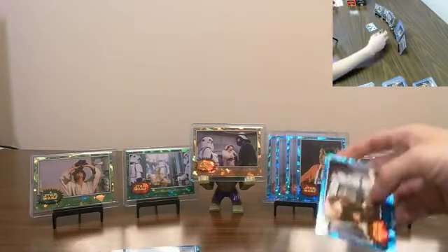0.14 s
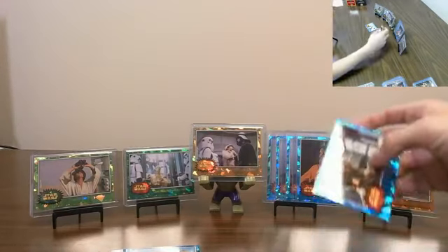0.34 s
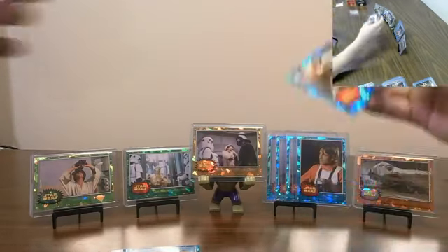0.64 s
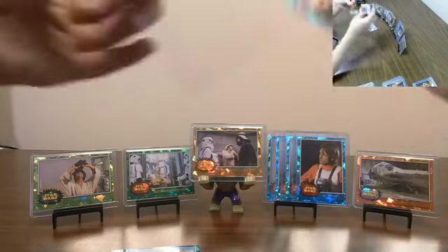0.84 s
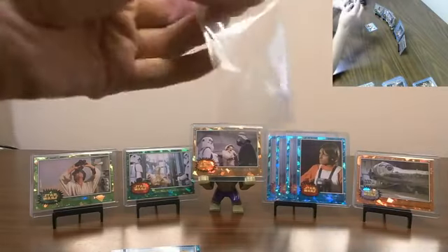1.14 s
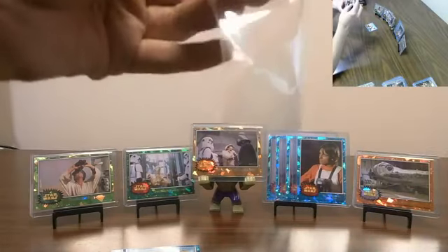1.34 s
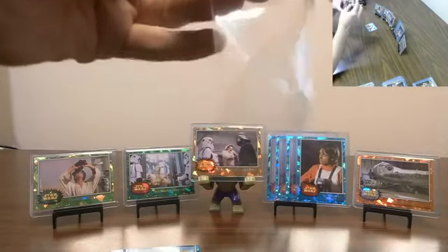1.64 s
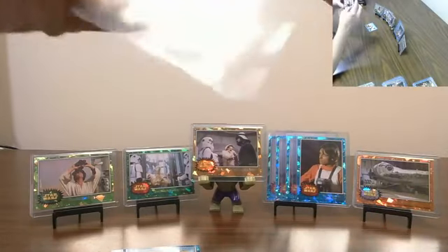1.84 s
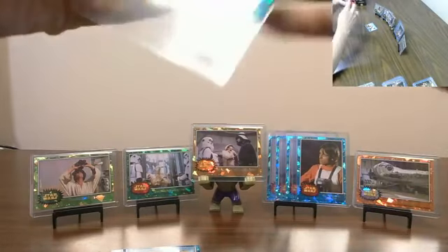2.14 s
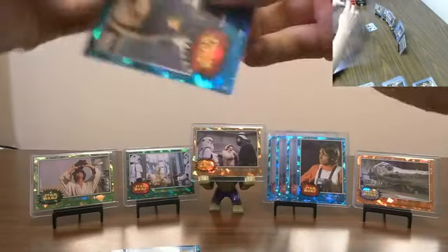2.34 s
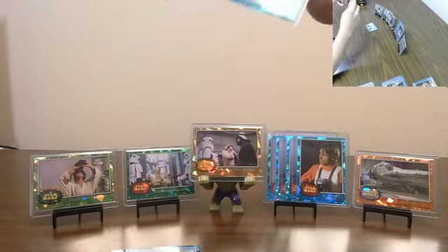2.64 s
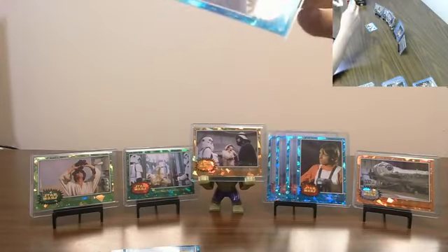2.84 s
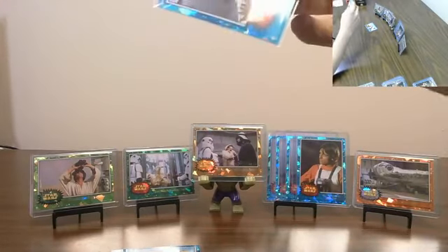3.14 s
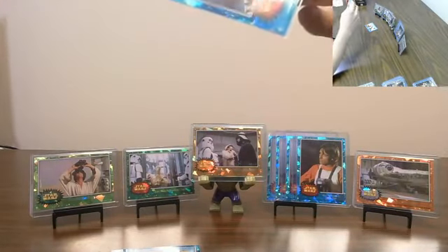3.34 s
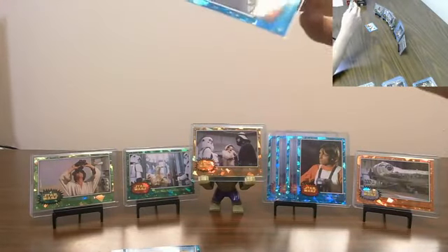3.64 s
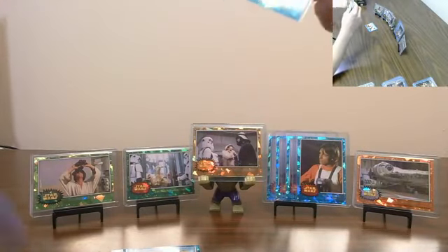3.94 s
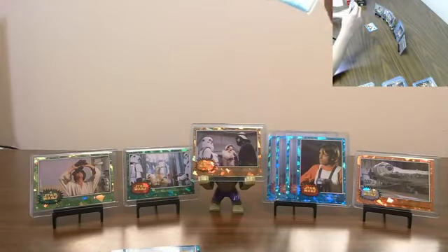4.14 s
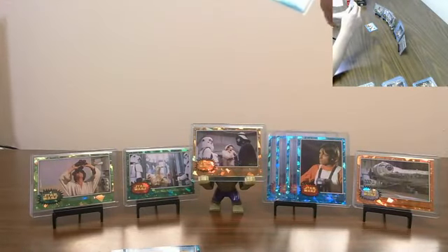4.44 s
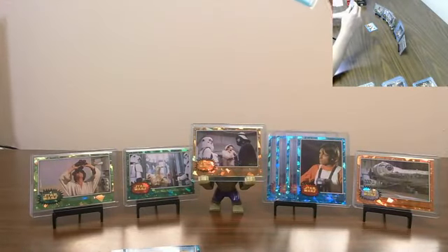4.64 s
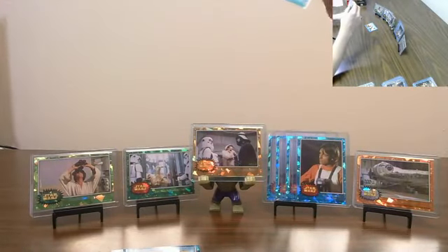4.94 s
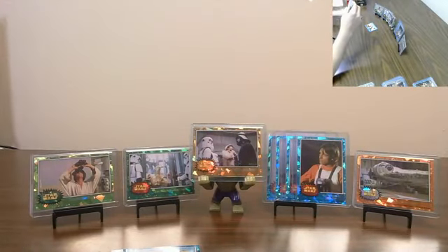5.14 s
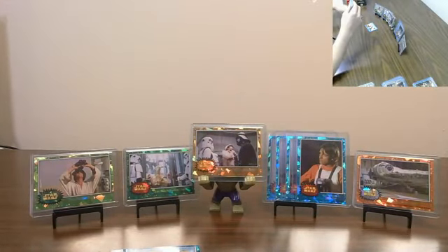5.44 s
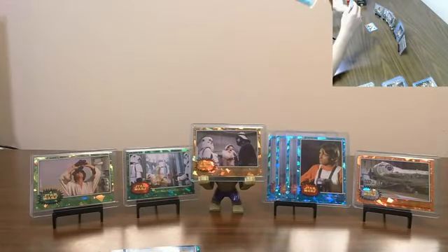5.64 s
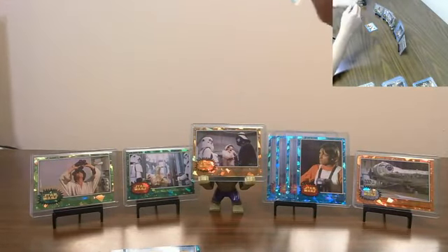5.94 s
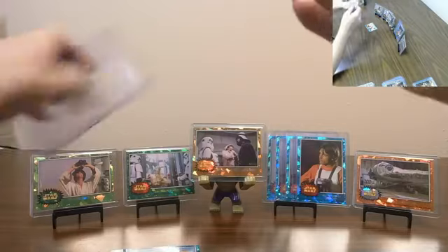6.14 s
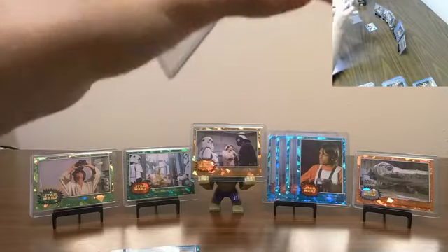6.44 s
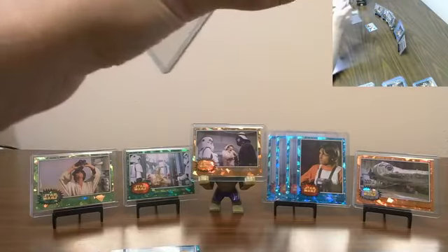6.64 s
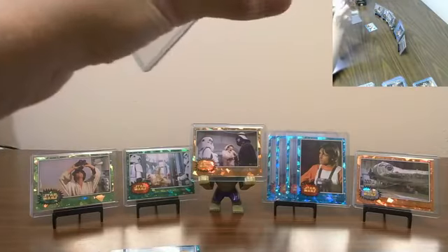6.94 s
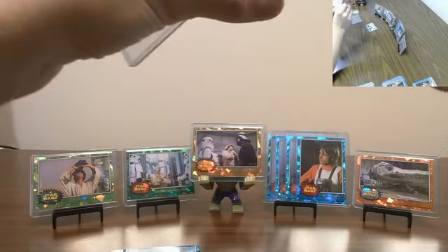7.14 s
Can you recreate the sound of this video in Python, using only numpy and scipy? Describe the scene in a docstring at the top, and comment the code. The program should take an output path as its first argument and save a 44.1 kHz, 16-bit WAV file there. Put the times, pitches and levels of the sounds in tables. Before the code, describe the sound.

Close handling of thin crinkly plastic and a stiff card, one sharp hard clack, crisp clicks, over faint fan throb in a quiet room.

```python
"""Card into a plastic sleeve

A trading card is slid into a thin plastic sleeve close to the microphone, over a table in a small quiet room.
The film swishes and ticks (shaped friction noise, short snaps) and the card's edge rasps home (stick-slip
through resonances). Rigid holders are knocked, clacked down and clicked apart (cracks and ringing modes).
Under it lie room air (coloured noise), a fan's low throb, mains hum and a faint pulsing whine (sines)."""
import sys
import numpy as np
from scipy import signal
from scipy.fft import rfft, irfft, next_fast_len
from scipy.io import wavfile
from scipy.ndimage import uniform_filter1d, minimum_filter1d, map_coordinates

SR = 44100
rng = np.random.default_rng(int(sys.argv[2]) if len(sys.argv) > 2 else 0)


def master(y):
    """Save y as 16-bit WAV."""
    cut = np.clip(np.atleast_2d(y).T, -1, 1)
    pcm = np.round(cut * 32767)  # scale
    wavfile.write(sys.argv[1], SR, pcm.astype(np.int16))


N = 321930  # samples in the scene


def amp(db):
    """Decibels to gain."""
    return np.exp(np.log(10) / 20 * np.asarray(db))


def unit(x):
    """Scale to rms 1."""
    return x / np.sqrt(np.mean(x ** 2) + 1e-20)


def along(points, hz):
    """Read (f/Hz, value) points at any frequency, on a log axis."""
    f, v = np.transpose(points)
    return np.interp(np.log(hz + 1), np.log(f + 1), v)


def fade(t, t60):
    """Exponential decay, 60 dB down after t60 seconds."""
    return np.exp(-np.log(1000) * t / t60)


def wobble(rate):
    """A smooth random curve through `rate` knots a second."""
    knots = rng.standard_normal(int(N * rate / SR) + 4)
    place = np.arange(0, len(knots) - 1, .125)  # eight spline points per knot
    return np.interp(np.arange(N) * rate / SR, place, map_coordinates(knots, [place]))


def filtered(x, response):
    """Multiply the spectrum of x by a response of frequency."""
    m = next_fast_len(len(x) + 8192)
    return irfft(rfft(x, m) * response(np.fft.rfftfreq(m, 1 / SR)), m)[:len(x)]


def coloured(x, spectrum):
    """Filter x by a (f/Hz, level/dB) response and scale it to rms 1."""
    return unit(filtered(x, lambda hz: amp(along(spectrum, hz))))


def add(track, s, sound):
    """Mix a sound into the track, s seconds in."""
    i = max(round(s * SR), 0)
    track[i:i + len(sound)] += sound[:max(len(track) - i, 0)]


def room(x, wet_db):
    """Add the answer of walls and table, drawn anew at each call; each frequency dies at its own speed."""
    # how long the room holds each frequency: (f/Hz, t60/s)
    decay_times = [(150, 0.6), (600, 0.094), (1500, 0.26), (4000, 0.25), (8000, .34), (15000, 0.17)]
    hz, t, z = signal.stft(rng.standard_normal(16384), SR, nperseg=256)
    z = z * fade(t, along(decay_times, hz)[:, None])
    tail = signal.istft(z, SR, nperseg=256)[1]
    tail *= 1 - np.exp(-(np.arange(len(tail)) / SR / 0.0047) ** 2)  # the tail builds up over some 5 ms
    tail *= amp(wet_db) / np.linalg.norm(tail)
    tail[0] += 1  # the direct sound
    tail[int(SR * rng.uniform(.0006, .0016))] += .4  # the bounce off a nearby hand or the table top
    return signal.fftconvolve(x, tail)[:N]


def friction(spectrum, grain_db, flutter_db):
    """Countless tiny slips of uneven size, in clumps: noise whose level flickers fast and slower."""
    unevenness_db = grain_db * wobble(1300) + flutter_db * wobble(70)
    return coloured(rng.standard_normal(N) * amp(unevenness_db), spectrum)


def pressed(rows, attack_s, release_s):
    """Gain of a contact that grips quickly, swells or eases while it slides, then lets go."""
    out = np.zeros(N)
    for s, length, db, growth in rows:
        t = np.maximum(np.arange(N) / SR - s, 0)
        held = np.minimum(t, length)
        grip = 1 - np.exp(-t / attack_s)
        release = np.exp((held - t) / release_s)
        out += amp(db + growth * held) * grip * release
    return out


def snap(spectrum, t60, spread, size=2048):
    """A sudden slip and its short dense ring, through a causal colour; its energy is that of 1 ms at rms 1."""
    t = np.arange(size) / SR
    push = rng.standard_normal(size) * fade(t, t60)
    push *= spread / np.linalg.norm(push)
    push[0] += 1  # the slip itself
    power = uniform_filter1d(np.abs(rfft(push)) ** 2, size=25)
    target = amp(along(spectrum, np.fft.rfftfreq(size, 1 / SR)))
    # divide out the push's own broad shape, then fold the cepstrum so that nothing sounds ahead of the slip
    cepstrum = irfft(np.log(target / np.sqrt(power)))
    cepstrum[1:size // 2] *= 2
    cepstrum[size // 2 + 1:] = 0
    sound = irfft(np.exp(rfft(cepstrum)) * rfft(push))
    return sound / np.linalg.norm(sound) * np.sqrt(SR / 1000)


def background():
    """Room air as coloured noise, a fan's throb and mains hum as sines, a whine that pulses once a turn."""
    # the fan's throb: (multiple of the turning rate, level/dB rms)
    fan_partials = [(1, -61), (2, -68), (3, -70), (4, -76), (6, -86.5), (8, -85), (9, -88.5), (13, -89)]
    # mains hum: (f/Hz, level/dB rms)
    hum_partials = [(120, -70), (177, -82), (240, -86.5)]
    # the whine ahead of its pulsing: (f/Hz, level/dB rms)
    whine_partials = [(5626, -93), (8005, -94)]
    # colour of the room's floor: (f/Hz, level/dB)
    air_colour = [(20, 6.5), (35, -15), (100, -16), (160, -22), (300, -23), (450, -29), (590, -28),
                  (750, -33), (1500, -42), (2500, -43), (5000, -45.5), (7000, -51), (12000, -52),
                  (14000, -48.5), (16000, -57.5)]
    fan_hz = 24.18  # turns a second
    t = np.arange(N) / SR
    turn = 2 * np.pi * fan_hz * t + 0.052 * wobble(1.4)

    def tone(db, phase):
        return amp(db) * np.sqrt(2) * np.sin(phase + rng.uniform(0, 2 * np.pi))

    fan = sum(tone(db, k * turn) for k, db in fan_partials)
    hum = sum(tone(db, 2 * np.pi * hz * t + 0.17 * wobble(6.0)) for hz, db in hum_partials)
    whine = sum(tone(db, 2 * np.pi * hz * t + .5 * wobble(16)) for hz, db in whine_partials)
    pulse = 1 + 0.49 * np.sin(turn)
    air = amp(-57.5) * coloured(rng.standard_normal(N), air_colour)
    return fan + hum + pulse * whine + air


def hands():
    """Dull bumps (decaying low sines) and rubs (dark friction noise) of hands and arms on the table top."""
    # soft bumps: (t/s, level/dB, f/Hz, t60/s)
    bump_rows = [(0, -38.5, 57, 0.16), (0.986, -30.5, 64.7, 0.13), (4.153, -50, 169, 0.17),
                 (4.209, -52, 195, 0.083), (4.386, -49.5, 137, 0.11), (5.476, -31, 140, 0.04),
                 (5.522, -44, 61, 0.2), (6.682, -45, 66.8, 0.18)]
    # a hand shifting on the table: (t/s at the start, length/s, level/dB at the start, growth/dB per s)
    shift_rows = [(4.15, 0.13, -57.5, -68), (4.38, .03, -61.5, -70), (5.474, 0.13, -63, -50)]
    # colour of the rub: (f/Hz, level/dB)
    rub_colour = [(60, -14), (150, 0), (300, -7), (500, -15.5), (1200, -21), (3000, -25), (8000, -44),
                  (16000, -65)]
    rub = friction(rub_colour, grain_db=0.0, flutter_db=4.5)
    out = pressed(shift_rows, attack_s=0.002, release_s=0.03) * rub
    t = np.arange(SR // 2) / SR
    soft_onset = 1 - np.exp(-t / 0.0065)
    for s, db, hz, t60 in bump_rows:
        add(out, s, amp(db) * np.sin(2 * np.pi * hz * t) * fade(t, t60) * soft_onset)
    return out


def crinkles(rate, low_hz, high_hz, cycles, spread_db):
    """Tiny buckles of the film, each with its own size and pitch; a few stand out as ticks."""
    out, t = np.zeros(N), np.arange(128) / SR
    for when, pitch, size in rng.random((int(rate * N / SR), 3)):
        hz = low_hz * (high_hz / low_hz) ** pitch
        level = amp(-spread_db * np.sqrt(size))
        add(out, when * (N - 1) / SR, level * np.sin(2 * np.pi * hz * t) * fade(t, cycles / hz))
    return unit(out)


def sleeve():
    """Each stroke swells and dies as film slides over card; sparse crinkles ride on it."""
    # strokes of plastic on plastic: (t/s at the peak, swish level/dB, fine hiss/dB over the swish, rise/s)
    stroke_rows = [(.01, -65, -10, 0.023), (.14, -71.5, -11.5, 0.088), (.52, -70.5, -5.5, 0.026),
                   (.655, -65, -18, 0.072), (1.019, -70.5, -7, 0.045), (1.489, -68, -15, 0.021),
                   (1.569, -59.5, -6.5, .011), (1.735, -73, -2, .02), (1.778, -55, -8.5, .012),
                   (1.908, -56, -27, 0.027), (2.137, -67, -5, 0.041), (2.285, -60.5, -1, 0.016),
                   (2.41, -66, -11, 0.023), (2.497, -62, -3, .012), (2.83, -78, -9, .025),
                   (3.33, -74, -16, .05), (4.239, -65, -24, 0.017), (4.52, -79.5, -18, .25),
                   (4.948, -40, -14, .0025), (5.087, -57.5, 0, .013), (5.547, -64.5, -17, 0.04),
                   (5.9, -58.5, -10, 0.039), (6.2, -77.5, -12.5, 0.13), (6.329, -63, -16, 0.0087),
                   (7.19, -68, -0.5, .026), (7.276, -68, -6.5, .04)]
    # colour of the swish: (f/Hz, level/dB)
    swish_colour = [(200, -18.5), (700, -17), (1500, -13), (3000, -9), (4500, -3.5), (6500, -8),
                    (9000, -18), (15000, -29.5)]
    # colour of the fine hiss: (f/Hz, level/dB)
    hiss_colour = [(3000, -45.5), (6000, -12), (8000, 3), (10000, 3.5), (13000, -9), (16000, -10)]
    fall_over_rise, roundness = 1.05, 0.97  # every stroke's shape; roundness 1 is a cusp, 2 a bell
    t = np.arange(0, N, 32) / SR  # coarse clock for the slow swells
    s, swish_db, hiss_db, rise = np.transpose(stroke_rows)
    age = (t[:, None] - s) / rise
    speed = np.exp(-np.maximum(-age, age / fall_over_rise) ** roundness)
    swish_gain = np.interp(np.arange(N) / SR, t, speed @ amp(swish_db))
    hiss_gain = np.interp(np.arange(N) / SR, t, speed @ amp(swish_db + hiss_db))
    body = amp(-2.5) * friction(swish_colour, grain_db=1.5, flutter_db=1.5)
    body += amp(-5.5) * crinkles(rate=520, low_hz=2370, high_hz=7540, cycles=11, spread_db=29.5)
    hiss = friction(hiss_colour, grain_db=2.5, flutter_db=4.0)
    return room(swish_gain * body + hiss_gain * hiss, wet_db=-17.5)


def tick(db, centre_hz, fall_db):
    """One snap of plastic and its weaker afterslip, coloured around their own centre frequency."""
    # colour that all snaps share: (f/Hz, level/dB)
    plastic_colour = [(80, -1), (350, 20.5), (600, 3), (1100, 6), (2000, -2), (2800, 1.5), (4000, 1.5),
                      (5500, -2), (9000, -4.5), (12500, -11), (16000, -16)]
    tip_octaves = 0.14  # width of the rounded top of the colour
    afterslip_s, afterslip_db = .004, -11  # typical delay and level
    hz = np.geomspace(60, 20000, 60)
    octaves_off = np.hypot(np.log2(hz / centre_hz), tip_octaves)
    colour = np.transpose([hz, along(plastic_colour, hz) - fall_db * octaves_off])
    sound = snap(colour, t60=0.012, spread=2.2)
    afterslip = amp(afterslip_db) * snap(colour, t60=0.0052, spread=1.5)
    add(sound, afterslip_s * rng.uniform(.5, 1.5), afterslip)
    return amp(db - 7.5) * room(sound, wet_db=-13)


def ticks():
    """Plastic buckles or an edge catches: a sudden slip at each listed time."""
    # snaps of film, card and holder: (t/s, relative level/dB, centre f/Hz, fall either side/dB per octave)
    tick_rows = [(.454, -50.5, 3970, 9), (0.648, -44, 4500, 7), (.674, -36.5, 5100, 10),
                 (.7, -45.5, 1900, 7.5), (.742, -34.5, 2350, 8.5), (.983, -41, 2960, 6),
                 (1.149, -45.5, 2160, 8.5), (1.18, -46.5, 1090, 5.5), (1.381, -43, 3660, 11),
                 (1.583, -41, 5400, 12.5), (1.786, -39.5, 4950, 18), (1.832, -45, 4570, 4.5),
                 (1.895, -36, 5460, 6), (1.949, -37.5, 3300, 5.5), (2.067, -53, 3380, 10),
                 (2.095, -40.5, 8260, 4.5), (2.28, -36.5, 3800, 11.5), (2.342, -51, 4970, 17),
                 (2.409, -43, 5000, 15), (2.44, -52, 3500, 5), (2.472, -43.5, 8000, 6),
                 (2.481, -24.5, 4540, 8), (3.338, -50, 1800, 6.5), (3.461, -34, 2240, 16.5),
                 (3.547, -34, 2150, 27), (3.575, -46, 1500, -1), (3.619, -37, 2760, 22),
                 (3.85, -46, 2490, 17), (3.924, -56, 2170, 8), (4.15, -34.5, 3330, 11),
                 (4.18, -43.5, 4000, 11), (4.207, -38.5, 3000, 6), (4.383, -40, 4130, 5.5),
                 (4.804, -41.5, 10910, 7.5), (5.434, -54, 4360, 6), (5.473, -52, 4500, 6),
                 (5.686, -25.5, 5200, 6), (5.887, -22.5, 4100, 10.5), (6.024, -49, 5300, 10),
                 (6.49, -47, 4140, 9.5), (6.527, -55, 4300, 5), (7.247, -54, 4800, 8)]
    out = np.zeros(N)
    for s, db, centre_hz, fall_db in tick_rows:
        add(out, s, tick(db, centre_hz, fall_db))
    return out


def rasp():
    """The card sticks and slips at an uneven rate; its resonances shift and trade strength as it bends."""
    # pushes of the card's edge into the sleeve: (t/s at the start, length/s, level/dB there, growth/dB per s)
    push_rows = [(3.395, 0.087, -69.5, 82), (3.515, .066, -66, 190), (3.617, .044, -52, 42)]
    # the card's resonances: (f/Hz, width/Hz, level/dB)
    card_modes = [(970, 430, -11), (1660, 200, -3), (2460, 180, -4), (2970, 230, -3.5), (3800, 190, -10.5),
                  (4750, 640, -15)]
    phase = np.cumsum(400 * amp(2.5 * wobble(250))) / SR  # around 400 slips a second
    slips = np.diff(np.floor(phase), prepend=0) * amp(2.5 * rng.standard_normal(N))
    drive = unit(slips) + 0.45 * rng.standard_normal(N)

    def band(centre, width):
        return filtered(drive, lambda f: 1j * f * width / (centre * centre - f * f + 1j * f * width))

    card = sum((-1) ** k * amp(db + 1.9 * wobble(55)) * band(hz, width)
               for k, (hz, width, db) in enumerate(card_modes))
    bend = .0006 * SR * wobble(45)  # a wandering delay in samples shifts the pitch
    body = map_coordinates(unit(card), [np.arange(N) + bend], order=2)
    grit = coloured(drive, [(200, -19), (800, 8), (4000, 0), (8000, -5.5), (15000, -40)])
    contact = pressed(push_rows, attack_s=0.0013, release_s=0.0056)
    return room(contact * (body + amp(-6) * grit), wet_db=-11)


def ring(modes, t):
    """Sum damped modes, each struck at a new strength."""
    return sum((-1) ** k * amp(db + rng.standard_normal()) * fade(t, t60) * np.sin(2 * np.pi * hz * t)
               for k, (hz, db, t60) in enumerate(modes))


def clacks():
    """Rigid holders hit the table and each other: a hard crack, the holder's ring and the table's thud."""
    # blows: (t/s, level/dB, then relative table thud/dB, crack/dB, ring/dB, brightness/dB per octave)
    clack_rows = [(4.2873, -34, -5, -2, -31, -2), (4.2879, -33.5, 4, -15, -8, -4.5),
                  (4.947, -40, -19, -13, -3, -0.5), (4.9540, -16.5, -6, -0.5, 2, 0),
                  (4.9668, -31, -6.5, -5, -1, 1.5)]
    # the holder's modes: (f/Hz, level/dB, t60/s)
    holder_modes = [(690, -15, .1), (836, -15, .1), (1106, -10, .12), (1288, -6, .1), (1346, -6, .09),
                    (1445, 1, .1), (1518, -2, .1), (1863, -7, .12), (2063, -12, .13), (2371, -10, .07),
                    (2702, -4, .08), (2840, -6, .09), (3034, -4, .07), (3363, -1, .08), (3450, -5, .07),
                    (3506, -6, .07), (3660, -3, .06), (3848, -5, .08), (3994, -10, .09), (4990, -8, .08),
                    (5410, -13, .08), (6550, -12, .07), (7220, -17, .07)]
    # the table's modes: (f/Hz, level/dB, t60/s)
    table_modes = [(142, -2, 0.12), (177, -16, 0.28), (261.9, -9, .35), (296, -8, 0.29), (338, -9, 0.15),
                   (389.7, -8, 0.22), (522, -17.5, .05), (714, -18.5, 0.0696), (770, -5, 0.065),
                   (900, -2, 0.03), (1034, -2.5, 0.08), (1240, -0.5, 0.093)]
    # colour of the crack ahead of each blow's brightness: (f/Hz, level/dB)
    crack_colour = [(100, -5.5), (500, 2.5), (1400, -0.5), (2000, -3.5), (3300, 4.5), (4300, -3),
                    (5000, -3), (8000, -13), (12000, -18), (16000, -27.5)]
    out, t = np.zeros(N), np.arange(SR // 2) / SR
    for s, db, thud_db, crack_db, ring_db, tilt_db in clack_rows:
        blow = amp(ring_db - 16.5) * ring(holder_modes, t)
        blow += amp(thud_db - 15.5) * ring(table_modes, t)
        colour = [(hz, level + tilt_db * np.log2(hz)) for hz, level in crack_colour]
        add(blow, 0, amp(crack_db + 9.0) * snap(colour, t60=0.019, spread=1.3))
        add(out, s, amp(db) * room(blow, wet_db=-12.5))
    return out


def scene():
    """The handling over the room's floor, on one channel."""
    return (background() + hands() + sleeve() + ticks() + rasp() + clacks())[None]


def record(dry):
    """A fast limiter that turns down around peaks, then a steep cut of the extreme treble."""
    ceiling, top_hz = .19, 15900
    needed = ceiling / np.maximum(np.abs(dry[0]), ceiling)
    gain = uniform_filter1d(minimum_filter1d(needed, size=31), size=31)
    return filtered(dry[0] * gain, lambda hz: 1 / np.sqrt(1 + (hz / top_hz) ** 160))[None]


dry = scene()
out = record(dry)
master(out)
```